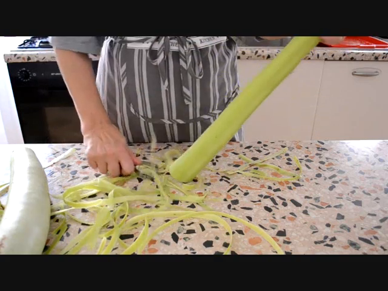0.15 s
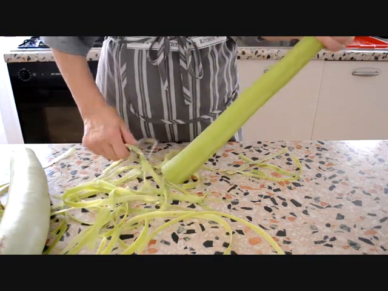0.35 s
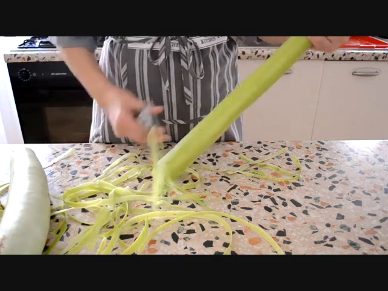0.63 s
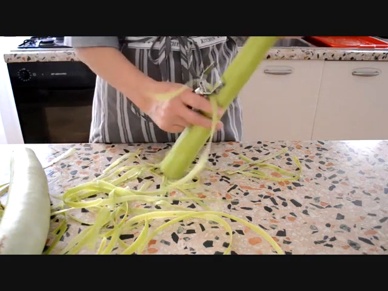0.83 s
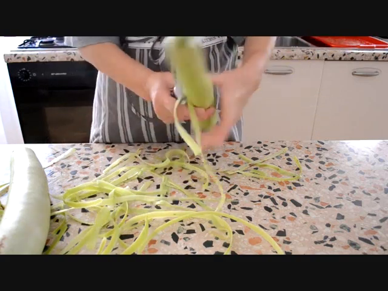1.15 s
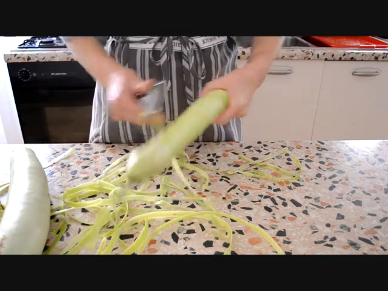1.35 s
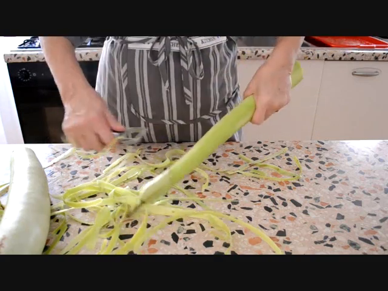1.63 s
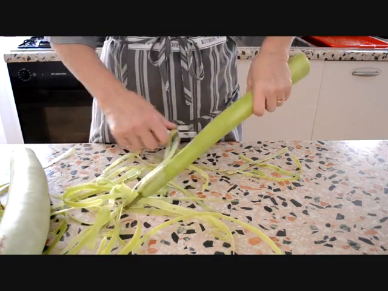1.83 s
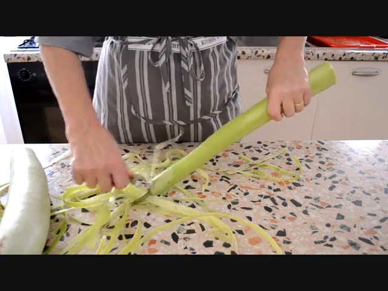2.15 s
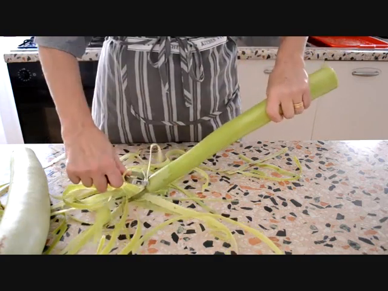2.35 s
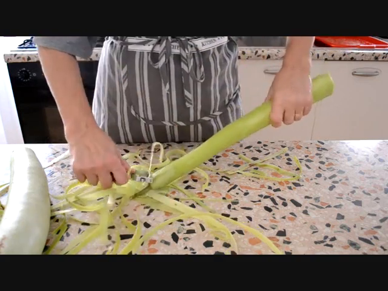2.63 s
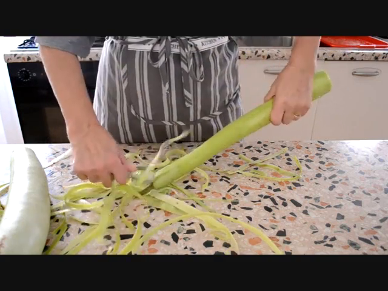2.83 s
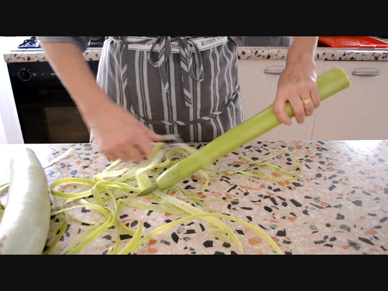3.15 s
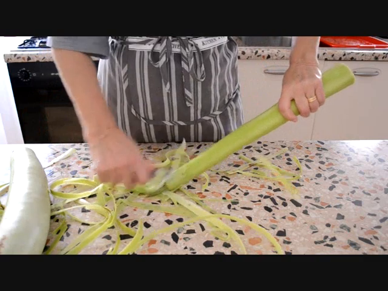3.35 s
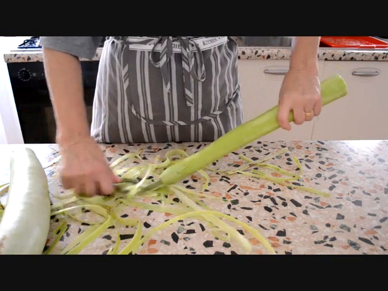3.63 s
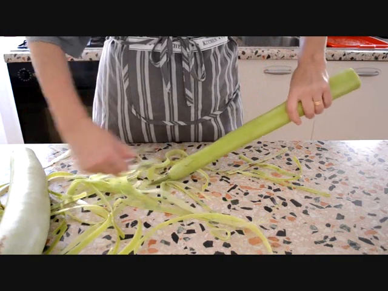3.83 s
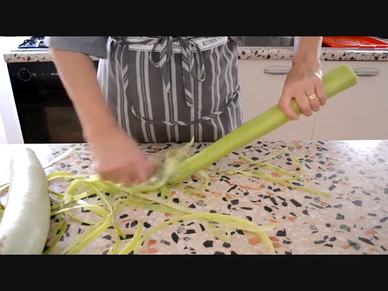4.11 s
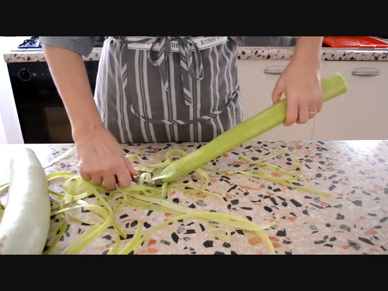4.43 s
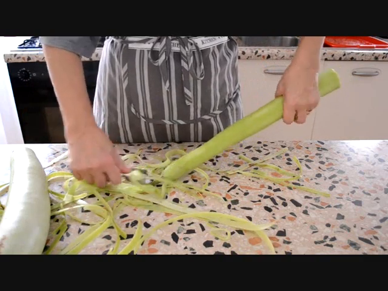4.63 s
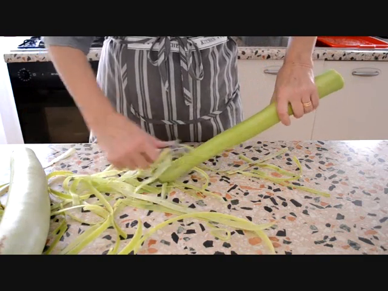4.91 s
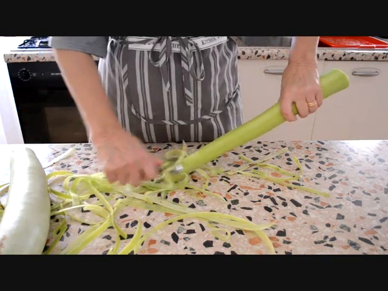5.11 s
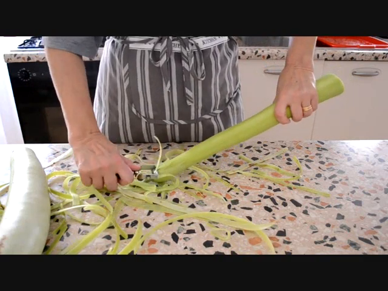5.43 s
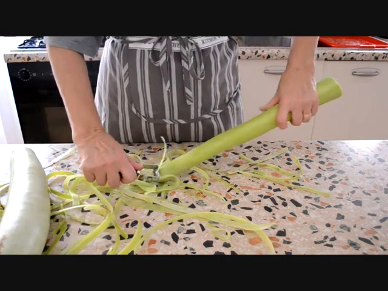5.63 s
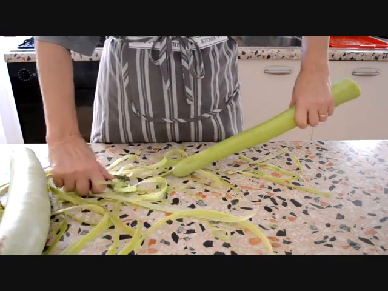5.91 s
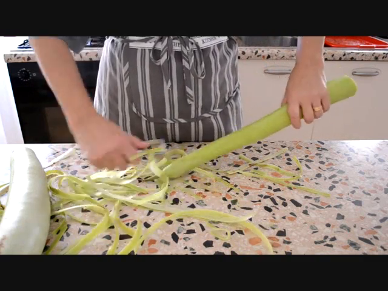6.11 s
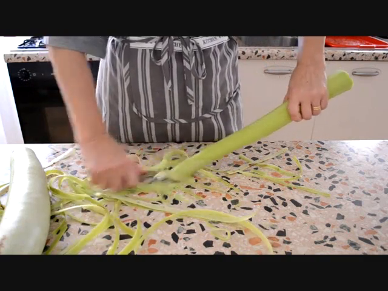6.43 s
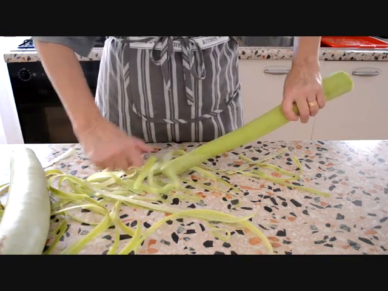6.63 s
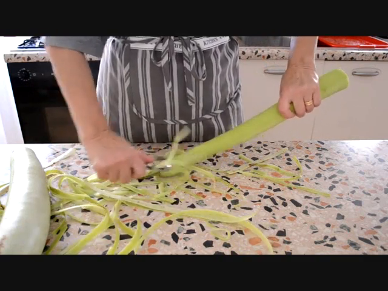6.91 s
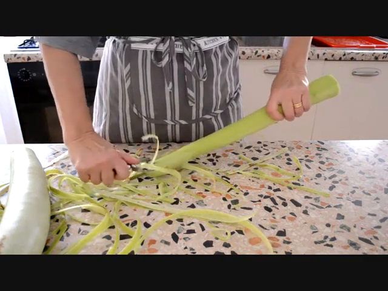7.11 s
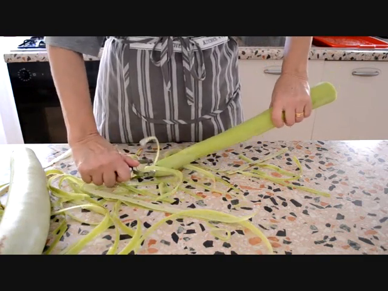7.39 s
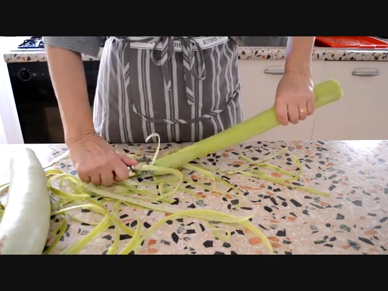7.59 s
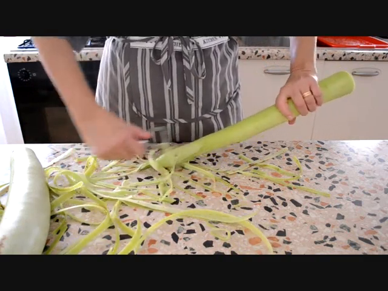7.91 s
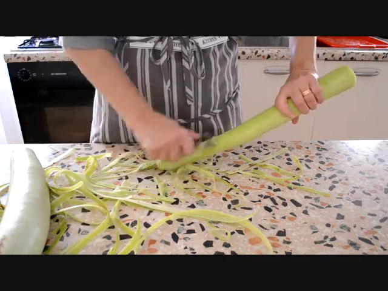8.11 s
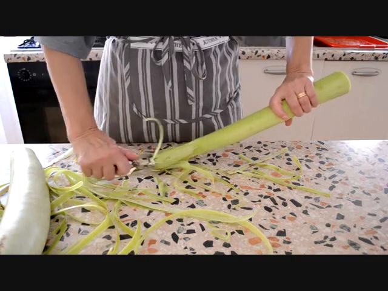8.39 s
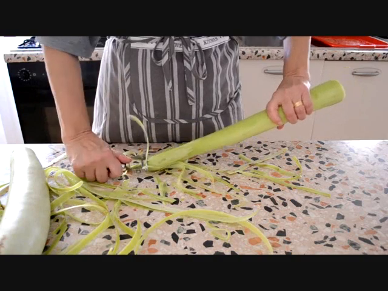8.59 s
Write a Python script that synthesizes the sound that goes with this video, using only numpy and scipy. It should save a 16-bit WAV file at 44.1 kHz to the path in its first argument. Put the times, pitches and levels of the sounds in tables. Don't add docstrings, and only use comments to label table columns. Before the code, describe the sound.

Raspy vegetable peeling strokes with metallic rattles, sharp snaps and dull thumps on a stone counter, over faint fridge hum and two distant yaps.

```python
import sys
import numpy as np
from scipy import signal
from scipy.fft import rfft, irfft
from scipy.io import wavfile
from scipy.ndimage import uniform_filter1d

SR = 44100
rng = np.random.default_rng(int(sys.argv[2]) if len(sys.argv) > 2 else 0)


def unload_wav(signal):
    wavfile.write(
        sys.argv[1],
        SR,
        np.round(np.clip(np.atleast_2d(signal).T, -1, 1) * 32767).astype(np.int16),
    )


def natural_amplitude(level_db):
    exponent = np.asarray(level_db, float) / 20
    return 10 ** exponent


N = 385875


def evened(x):
    return x / np.sqrt(np.mean(x ** 2) + 1e-20)


def read(points, hz):
    f, value = np.transpose(points)
    return np.interp(np.log(hz + 1), np.log(f + 1), value)


def add(mix, s, sound):
    part = mix[round(s * SR):][:len(sound)]
    part += sound[:len(part)]


def colour(x, points):
    gain_db = read(points, np.fft.rfftfreq(len(x), 1 / SR))
    return irfft(rfft(x) * natural_amplitude(gain_db), len(x))


def resonate(x, hz, width):
    turn = np.exp(2j * np.pi * np.cumsum(hz * np.ones(len(x))) / SR)
    r = np.exp(-np.pi * width / SR)
    return 2 * (turn * signal.lfilter([1 - r], [1, -r], x / turn)).real


def ring(modes, luck, spread_db, size):
    t = np.arange(size) / SR
    total = np.zeros(size)
    for k, (hz, db, t60) in enumerate(modes):
        level = natural_amplitude(db + spread_db * luck[k] - 60 * t / t60)
        tuned_hz = hz * (1 + .008 * luck[-1 - k])
        total += (-1) ** k * level * np.sin(2 * np.pi * tuned_hz * t)
    return total


def unpack(rows):
    s, *columns = np.transpose(rows)
    t = np.arange(s[0], s[-1], 1 / SR)
    fade = signal.windows.tukey(len(t), min(1, 400 / len(t)))
    return s[0], fade, [np.interp(t, s, c) for c in columns]


# frequency in Hz, level in dB per Hz.
AIR = [(25, -32), (60, -15), (130, -9), (400, 0), (1000, -3), (2700, -8), (4000, -12.5), (7800, -22),
       (9300, -24.5), (10500, -24.5), (12000, -48.5)]
# frequency in Hz, width in Hz, level in dB.
HUM = [(99.5, 13, -73.5)]


def air():
    noise, drift, buzz = rng.standard_normal((3, N))
    swell_db = 0.48 * evened(uniform_filter1d(drift, 6000))
    sound = natural_amplitude(-57 + swell_db) * evened(colour(noise, AIR))
    for hz, width, db in HUM:
        sound += natural_amplitude(db) * evened(resonate(resonate(buzz, hz, width), hz, width))
    return sound


# frequency in Hz, time to fall by 60 dB in seconds.
ECHO_TIME = [(100, 0.79), (400, 0.74), (1200, 0.82), (3500, 0.68), (7000, 0.68), (11000, 0.53)]
# frequency in Hz, level in dB.
WALLS = [(100, -4), (500, -3.5), (1300, -4.5), (3500, -6.5), (7000, -10.5), (11000, -8)]


def kitchen(x):
    out, t = np.zeros(N), np.arange(N) / SR
    for k in range(3):
        hz, u, z = signal.stft(rng.standard_normal(SR), SR, nperseg=256)
        dying = natural_amplitude(-60 * u / read(ECHO_TIME, hz)[:, None])
        tail = signal.istft(z * dying, SR, nperseg=256)[1]
        late = np.maximum(np.arange(len(tail)) / SR - .002, 0)
        tail = tail * (1 - np.exp(-late / .007))
        share = np.sqrt(2 / 3) * np.cos(2 * np.pi * (t / 1.7 + k / 3))
        out += signal.fftconvolve(x * share, tail / np.linalg.norm(tail))[:N]
    return colour(out, WALLS)


# time in seconds, effort in dB, pitch in Hz, hoarseness from 0 to 1.
YAPS = [
    [(2.65, -53, 859, 0.53), (2.682, -36, 874, 0.55), (2.758, -31.5, 868, 0.57), (2.82, -32.5, 861, 0.44)],
    [(8.16, -34.5, 862, 0.5), (8.226, -38, 892, 0.62), (8.244, -27.5, 871, 0.3), (8.286, -49, 892, 0.35),
     (8.31, -37, 884, 0.3), (8.34, -42, 810, 0.2)],
]
# harmonic number, level in dB.
YAP_TONES = [(1, 0), (2, -11), (3, -21)]
# frequency in Hz, width in Hz, level in dB.
YAP_THROAT = [(850, 390, -3.5), (1255, 330, -14), (1985, 250, -9), (2380, 230, -14)]


def yap(rows):
    s, fade, (effort_db, hz, hoarse) = unpack(rows)
    noise, waver = rng.standard_normal((2, len(hz)))
    opening = np.minimum(np.arange(len(hz)) / SR / 0.031, 1)
    wavering_hz = hz * (1 + 0.0394 * evened(uniform_filter1d(waver, 500)))
    turns = np.cumsum(wavering_hz) / SR
    tones, rasp = np.zeros((2, len(hz)))
    for k, db in YAP_TONES:
        tones += natural_amplitude(db) * opening ** k * np.sin(2 * np.pi * k * turns)
    for f, width, db in YAP_THROAT:
        rasp += natural_amplitude(db) * opening ** (f / 900) * resonate(resonate(noise, f, width), f, width)
    voice = (1 - hoarse) * evened(tones) + hoarse * evened(rasp)
    return s, natural_amplitude(effort_db + 2.5) * fade * voice


# time in seconds, level in dB.
RUSTLES = [
    [(0.0, -49), (0.008, -52), (0.13, -61.5)],
    [(0.86, -63.5), (0.876, -52), (0.956, -63.5), (0.96, -55)],
    [(0.972, -31), (1.0, -44.5), (1.014, -43), (1.06, -46.5)],
    [(1.48, -61.5), (1.5, -36.5), (1.546, -57), (1.62, -36.5)],
    [(2.84, -65.5), (2.844, -54), (3.018, -67), (3.02, -60)],
    [(3.37, -68), (3.382, -78), (3.436, -56), (3.44, -38)],
    [(4.77, -66.5), (4.836, -48), (4.842, -59), (4.9, -65)],
    [(5.09, -84), (5.1, -69), (5.176, -83.5), (5.2, -34)],
    [(5.79, -77), (5.798, -58), (5.804, -65), (5.966, -82), (5.97, -74)],
    [(6.87, -56), (6.874, -47), (6.912, -61), (6.96, -55)],
    [(7.68, -94), (7.788, -91), (7.792, -78), (7.82, -55)],
]
# frequency in Hz, level in dB per Hz.
PEEL = [(880, -53), (1500, -4), (2530, -12), (2810, -3), (3480, -7), (3900, -8), (5490, -5), (7990, -11),
        (9250, -8.5), (10500, -11), (13700, -40.5), (22000, -120)]


def rustle(rows):
    s, fade, (level_db,) = unpack(rows)
    noise, grip = rng.standard_normal((2, len(fade)))
    snaps = noise * natural_amplitude(4.2 * evened(uniform_filter1d(grip, 130)))
    return s, natural_amplitude(level_db - 1.5) * fade * evened(colour(snaps, PEEL))


# start in seconds, peak in dB, frequency in Hz, time to fall by 60 dB in seconds.
PINGS = [(.008, -48, 4000, 0.17), (.155, -51, 3850, .2), (.21, -39, 3400, 0.17), (.235, -39, 4330, 0.066),
         (.262, -39, 850, 0.31), (.33, -10.5, 1510, 0.13), (1.217, -49, 3900, 0.068),
         (1.289, -48, 3900, 0.083), (1.323, -45.5, 4020, 0.17), (1.324, -49, 2790, 0.11),
         (1.346, -43, 2740, 0.073), (1.5, -54, 4010, 0.22), (1.52, -48, 2850, 0.11),
         (1.6, -38, 9300, 0.059), (2.11, -47, 9200, 0.22), (4.172, -42, 9200, 0.31),
         (5.195, -50.5, 4150, 0.11), (6.055, -23.5, 1222, 0.12), (6.5, -44, 4070, 0.25),
         (6.643, -26, 1140, 0.27), (6.643, -24, 2830, 0.084), (7.85, -40, 2940, 0.14),
         (7.925, -41, 5900, 0.044), (7.96, -36, 5830, .05)]


def ping(row, luck):
    s, db, hz, t60 = row
    t = np.arange(6000) / SR
    uneven = 1 + 0.31 * np.interp(t, np.arange(40) * 0.0061, luck[:40])
    swing = np.sin(2 * np.pi * hz * t) * signal.windows.tukey(6000, .06)
    sound = natural_amplitude(db - 60 * t / t60) * uneven * swing
    return sound, natural_amplitude(-2.0) * sound


# start in seconds, peak in dB, ring in Hz,
# overtone level in dB, counter boom in dB, level sent to the room in dB.
THUMPS = [(0.338, -18, 244, -9, -8.5, -3), (1.763, -37.5, 384, 7.5, -6, 3.5),
          (3.06, -36, 428, -10, -7.5, 10.5), (3.448, -40, 334, 2, -14, 13),
          (3.781, -16.5, 414, 11.5, -17, 4), (4.189, -32, 356, 17.5, 5, 4.5),
          (4.297, -28.5, 417, 6.5, -9, 6.5), (5.329, -30, 451, 2.5, -21, -18),
          (5.346, -22.5, 416.5, 11, -27, 12.5), (5.989, -12.5, 402, -15, -10.5, 2),
          (6.02, -32, 390, -13, -15, 8), (6.52, -34, 250, 1, -7, 6), (6.648, -22, 414, -16, -8, 1.5),
          (7.094, -35.5, 417.6, -8, -11, 6.5), (7.513, -33.5, 376, -2, -7, 3)]
# ratio to the ring, level in dB, time to fall by 60 dB in seconds.
SQUASH = [(0.598, -5.5, 0.1), (1.012, 7.5, .07)]
# ratio to the ring, level in dB, time to fall by 60 dB in seconds.
SQUASH_UPPER = [(1.33, -4.5, 0.061), (1.632, -4, 0.071), (1.979, -6.5, .1)]
# frequency in Hz, level in dB, time to fall by 60 dB in seconds.
COUNTER = [(60.6, 6.5, 0.16), (151, 3.5, 0.19)]


def thump(row, luck):
    s, db, hz, upper_db, boom_db, room_db = row
    modes = [(hz * ratio, d, t60) for ratio, d, t60 in SQUASH]
    modes += [(hz * ratio, d + upper_db, t60) for ratio, d, t60 in SQUASH_UPPER]
    modes += [(f, d + boom_db, t60) for f, d, t60 in COUNTER]
    soft_start = 1 - np.exp(-np.arange(9000) / SR / 0.0092)
    body = ring(modes, luck, 1.0, size=9000) * soft_start
    body = natural_amplitude(db - 8) * body / abs(body).max()
    return body, natural_amplitude(room_db) * body


# start in seconds, peak in dB, blade ring in dB,
# handle knock in dB, brightness in dB, level sent to the room in dB.
TICKS = [(0.0034, -34, -13, -18.5, -16.5, 8.5), (0.1357, -29.5, -4, -18.5, -10.5, 1.5),
         (0.1545, -27, -7, -33, -19.5, 5), (0.1994, -32.5, -9.5, -13.5, -12.5, 6),
         (0.2732, -17.5, -11.5, -21, -24, 6.5), (0.3241, 12, -17, -16, -22.5, 7.5),
         (0.8718, -40, -8, -5, -10.5, 5), (0.9666, -19.5, -1, -17, 1, 7.5),
         (1.0196, -22, -16.5, -38, -21, 4.5), (1.2156, -33.5, -6, -29.5, -30, 2),
         (1.288, -34, -11.5, -18, -15.5, 8), (1.3212, -24, -9.5, -40, -10, 4.5),
         (1.3447, -30.5, -7.5, -39, -26, 8.5), (1.392, -28, 11.5, -5.5, -8, 2),
         (1.4114, -54, -8, -6, -25, 1), (1.496, -37.5, 1, -14, -15.5, 5), (1.5226, -34, -5, -30, -7, 0.5),
         (1.5964, -30.5, -14, -17, -1.5, 1), (1.7671, -34, -4.5, -9, -45, 9),
         (1.912, -31.5, -18, -22.5, -15.5, 7), (2.1004, -25.5, -12, -34, -13, 6.5),
         (2.1061, -24.5, -9, -21, -12.5, 6.5), (3.025, -30, -12, -11, -16.5, 8),
         (3.047, -23, 10, -8, -9.5, 4.5), (3.0672, -11.5, -12, -22, -8.5, 5.5),
         (3.0942, -12.5, -8.5, -10, -30, 1.5), (3.4154, -38, -4.5, -14, 0, -5),
         (3.4421, -21, -7.5, -20, -11, 2), (3.4465, -13, -17.5, -50, -13.5, 4.5),
         (3.7686, -9.5, -13, -22.5, -6, 7.5), (3.78, -3, -9, -14.5, -31.5, 4),
         (4.0898, -38, 4, -16, -3, 10), (4.1658, -21.5, -6, -23, -13.5, 7), (4.1701, -13, -12, -27, -13, 2),
         (4.354, -20.5, -2.5, -12, -5, -0.5), (4.6387, -29, -19, -29, -15, 8),
         (4.8256, -32.5, 10, -23, 0, 3), (5.1467, -44, 1, -6, -31, -2), (5.201, -21.5, -5.5, -24, -8, 3),
         (5.9895, -21.5, -7, -30, -15.5, 1.5), (6.0048, -18.5, -13, -13, -12, 8),
         (6.0522, 0.5, -17.5, -14, -24, 4), (6.4994, -16.5, -8, -30, -10, 7),
         (6.6224, -15.5, -2, -13, -37, 13), (6.6395, -3, -7.5, -9.5, -26.5, 3.5),
         (6.9676, -14.5, -6, -25, -11.5, 3.5), (7.505, -32, 2, -13.5, -20, 3.5),
         (7.7961, -37, -7, 0, -29, 5.5), (7.8276, -33.5, 11, -42.5, -18.5, 9),
         (7.8524, -16, -11.5, -35, -8.5, 8), (8.0506, -36, -3, -25, -14.5, 10.5),
         (8.2783, -13.5, -5, -41, -6.5, 3), (8.7123, -26.5, -4.5, -9, -20.5, 7)]
# frequency in Hz, level in dB.
CRACK = [(60, -49), (300, -33), (1000, -15.5), (2500, 0), (4500, -1), (6500, -4), (8000, -8.5),
         (11000, -10)]
# frequency in Hz, level in dB, time to fall by 60 dB in seconds.
BLADE = [(2790, -9, 0.054), (3900, -1, 0.015), (5250, -11.5, 0.027), (7200, 3, 0.023), (9600, -6, .012),
         (10650, -7, 0.014)]
# frequency in Hz, level in dB, time to fall by 60 dB in seconds.
HANDLE = [(705, -7.5, .012), (800, -10.5, .014), (1080, 12.5, 0.012), (1290, 5, 0.034), (1554, 6, 0.0199),
          (1800, -7, 0.011)]


def tick(row, luck):
    s, db, ring_db, knock_db, bright_db, room_db = row
    t = np.arange(len(luck) - 20) / SR - .003
    length = 0.013 * natural_amplitude(-.2 * db)
    chatter = natural_amplitude(-60 * abs(t) / np.where(t < 0, 0.27 * length, length))
    chatter = chatter + .12 * natural_amplitude(-60 * t / .04) * (t > 0)
    rattle = luck[20:] * chatter
    click = 1. * (t == t[130])
    bright_crack = [(f, d + (bright_db + 17) * (f > 7000)) for f, d in CRACK]
    sounds = []
    for blow, weight_db in ((rattle, 4.0), (click, 9.0)):
        crack = evened(colour(blow, bright_crack))
        blade = evened(np.convolve(blow, ring(BLADE, luck, 4.2, size=1400))[:len(t)])
        knock = evened(np.convolve(blow, ring(HANDLE, luck[6:], 0.56, size=1200))[:len(t)])
        sounds.append(crack + natural_amplitude(ring_db) * blade + natural_amplitude(knock_db + weight_db) * knock)
    scale = natural_amplitude(db - 3.0) / abs(sounds[0]).max()
    return scale * sounds[0], scale * natural_amplitude(room_db) * sounds[1]


# time in seconds,
# pressure in dB, blade squeal in dB, squeal pitch in Hz, flesh rumble in dB.
STROKES = [
    [(0.145, -44, -10, 3690, -7.5), (0.153, -37, -2.5, 3820, -8.5), (0.187, -65.5, 7.5, 3650, -11.5),
     (0.271, -35, -0.5, 3610, -3.5), (0.31, -37, -10.5, 3800, -26)],
    [(2.11, -42.5, -6, 3550, -25), (2.134, -48.5, -11.5, 3470, -15), (2.198, -46.5, -10, 3310, -31.5),
     (2.218, -42.5, -3, 3470, -20), (2.296, -33.5, -22, 3600, -21.5), (2.39, -42, -7, 3570, 0)],
    [(3.03, -41, -5, 3350, 9), (3.068, -36.5, -27, 3410, -15), (3.088, -47.5, -14, 3370, -8),
     (3.092, -32.5, -21, 3330, -8.5), (3.16, -46.5, -15, 3630, 5)],
    [(3.45, -31, 0, 3460, -17.5), (3.454, -39, -3, 3440, -31.5), (3.52, -40.5, -2, 3700, -2.5),
     (3.558, -28.5, -8, 3570, -14.5), (3.62, -42.5, -6.5, 3360, -7)],
    [(4.175, -34, -4, 3400, -20.5), (4.183, -44, -15, 3380, 4), (4.223, -43.5, -34.5, 3380, -26.5),
     (4.285, -37, -29, 3250, -9), (4.361, -28, -22, 3260, -6.5), (4.42, -51, -16, 3340, 6.5)],
    [(5.205, -37, -12.5, 3810, -7), (5.217, -46, -38, 3740, -5), (5.273, -42.5, -20, 3500, -19),
     (5.371, -34.5, -8.5, 3580, 4.5), (5.41, -50, -3, 3450, -1)],
    [(5.975, -63.5, 6, 3430, 20), (5.991, -34, -9, 3500, 3), (6.042, -31.5, -16, 3330, 7)],
    [(6.503, -42.5, -8, 3870, -15), (6.511, -45, -23, 3920, -4.5), (6.559, -50, -21, 3330, -1),
     (6.593, -36, -11, 3300, -21), (6.625, -20.5, 6, 3190, -6)],
    [(6.972, -36, -12, 3610, -15), (6.98, -42, -13, 3620, -31), (7.018, -42.5, -4, 3370, -18),
     (7.114, -32.5, -2.5, 3280, -7.5), (7.17, -55.5, 11, 3200, -3)],
    [(7.51, -37, -3.5, 3430, -3.5), (7.52, -46.5, -5, 3370, 8.5), (7.6, -61, 6, 3200, 2)],
    [(7.856, -52, 13, 3130, 19), (7.9, -47.5, -21, 3100, -38), (7.93, -41.5, -0.5, 3110, -11)],
    [(8.284, -43, -6, 3340, -17), (8.332, -48, -4, 3280, 4.5), (8.408, -31.5, 1.5, 3250, -18.5),
     (8.458, -34, 3, 3310, -4.5), (8.5, -39.5, -21, 3220, -12.5)],
]
# frequency in Hz, level in dB per Hz.
SKIN = [(400, -22.5), (800, -17.5), (1400, -5.5), (2100, -0.5), (2700, -4), (3400, 0.5), (4600, -9),
        (6000, -10), (9400, -15), (10500, -18.5), (12000, -38.5)]
# frequency in Hz, width in Hz, level in dB.
FLESH = [(224.5, 360, -2), (406, 140, 9), (698, 270, 20), (965, 200, -18.5)]


def stroke(rows):
    s, fade, (pressure_db, squeal_db, hz, rumble_db) = unpack(rows)
    noise, grip = rng.standard_normal((2, len(hz)))
    tears = noise * natural_amplitude(2.2 * evened(uniform_filter1d(grip, 150)))
    squeal = evened(resonate(resonate(tears, hz, 600), hz, 600))
    rumble = evened(sum(natural_amplitude(db) * resonate(noise, f, width) for f, width, db in FLESH))
    sound = evened(colour(tears, SKIN))
    sound = sound + natural_amplitude(1.4 * squeal_db + 3.5) * squeal
    sound = sound + natural_amplitude(rumble_db - 2.5) * rumble
    return s, natural_amplitude(pressure_db - 4.5) * fade * sound


# frequency in Hz, level in dB.
MICROPHONE = [(40, -24.5), (150, -1.5), (6800, 0.5), (7900, -2.5), (9300, 5.5), (10400, 1)]


def scene():
    near, echo = np.zeros((2, N))
    hush = air()
    for source, events, lead in ((tick, TICKS, .003), (thump, THUMPS, .002), (ping, PINGS, .002)):
        for row, luck in zip(events, rng.standard_normal((len(events), 1500))):
            direct, sent = source(row, luck)
            add(near, row[0] - lead, direct)
            add(echo, row[0] - lead, sent)
    # source, tables, near level in dB, echo level in dB
    layers = ((stroke, STROKES, .1, 4.0), (rustle, RUSTLES, .1, 3.0), (yap, YAPS, -9, 1.5))
    for source, tables, near_db, echo_db in layers:
        for rows in tables:
            s, sound = source(rows)
            add(near, s, natural_amplitude(near_db) * sound)
            add(echo, s, natural_amplitude(echo_db) * sound)
    return (colour(near + kitchen(echo), MICROPHONE) + hush)[None]


def roll_off(x):
    return signal.sosfilt(signal.butter(12, 10690, fs=SR, output="sos"), x)


def record(dry):
    low_pass = signal.firwin(121, 11400, window=("kaiser", 8), fs=SR)
    limited = signal.oaconvolve(dry, low_pass[None], "same")
    return roll_off(np.clip(limited, -1, 1))


dry = scene()
out = record(dry)
unload_wav(out)
```